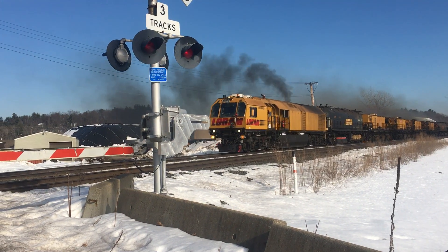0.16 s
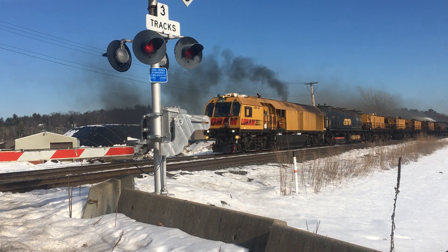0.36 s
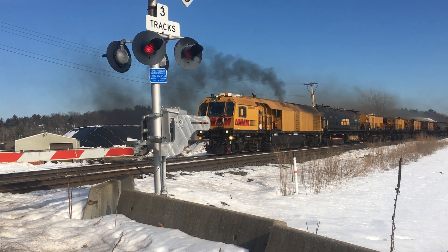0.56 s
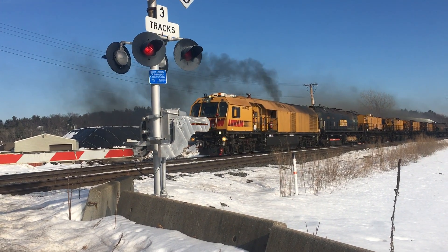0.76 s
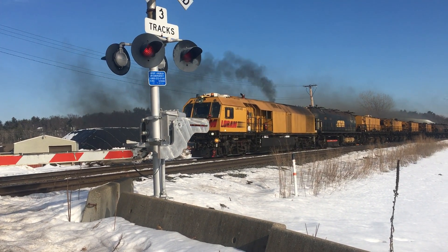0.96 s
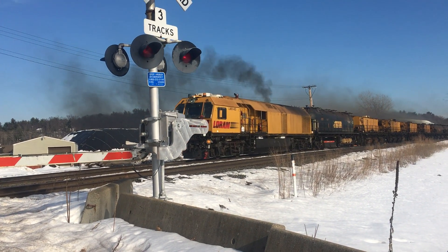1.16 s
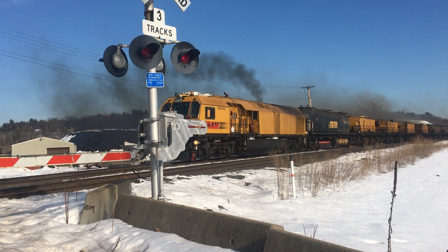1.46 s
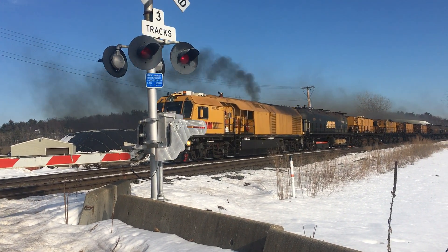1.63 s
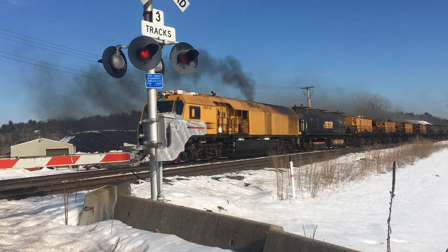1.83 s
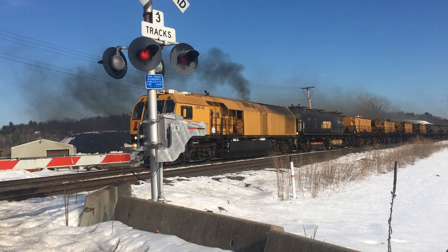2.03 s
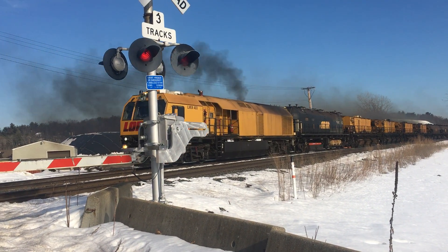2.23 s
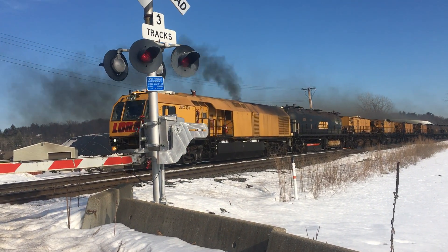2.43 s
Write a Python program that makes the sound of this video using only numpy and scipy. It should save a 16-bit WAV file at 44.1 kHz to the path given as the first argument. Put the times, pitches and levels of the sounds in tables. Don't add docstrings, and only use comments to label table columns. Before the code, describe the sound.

A loud three-note train horn blares, cuts off with a short echo, then a chugging diesel swells up.

```python
import sys
import numpy as np
from scipy import signal
from scipy.fft import rfft, irfft
from scipy.io import wavfile
from scipy.ndimage import uniform_filter1d, map_coordinates

SR = 44100
rng = np.random.default_rng(int(sys.argv[2]) if len(sys.argv) > 2 else 0)


def int16_out(signal):
    q = np.round(np.clip(np.atleast_2d(signal).T, -1, 1) * 32767)
    wavfile.write(sys.argv[1], SR, q.astype(np.int16))


def convert_level_to_amplitude(level_db):
    exponent = np.asarray(level_db, float) / 20
    return 10 ** exponent


N = 114219

CHIME_HZ = 311.02, 364.02, 486.9
LOW_CHIME = [-16, -5, 0, -2, -2, -6, -16, -26, -27, -19, -27, -23, -21, -21, -29, -40, -41, -45, -42, -39,
             -41, -45, -48, -57]
MID_CHIME = [-16, -6, -7, -11, -9, -25, -33, -29, -25, -38, -34, -31, -40, -47, -46, -41, -41, -48, -50,
             -53]
HIGH_CHIME = [-12, -2, 2, -7, -27, -27, -23, -28, -26, -38, -43, -40, -40, -43, -49]
# f/Hz, level/dB
FAINT_MULTIPLES = [(7300, -10), (8300, 3), (10000, 2), (12000, -3), (15700, -18.5)]
# t/s, low level/dB, middle level/dB, high level/dB, extra treble level/dB
BLAST = [
    (0, -9, -11, -6.5, 3.5),
    (.16, -7.5, -8.5, -6.5, -8),
    (.42, -7, -6.5, -7.5, 1.5),
    (.58, -5, -8.5, -7, 2),
    (.68, -9, -10, -8.5, 0),
    (.85, -11, -11, -6, -1.5),
    (1.001, -11.5, -6.5, -7, -3.5),
    (1.152, -10, -3, -6, -2.5),
    (1.27, -13, -7.5, -9.5, -1),
]
# f/Hz, level/dB
MIXING_TONES = [(250, -28), (900, -37), (1200, 0.5), (1650, 0), (2100, -17), (2330, -34.5), (2600, -18.5),
                (4600, -19)]
# f/Hz, level per Hz/dB
HORN_AIR = [(250, -11), (800, -13), (1500, -3.5), (2000, -8), (2330, -20), (2700, -22.5), (4400, -18.5),
            (5200, -32)]
# f/Hz, level per Hz/dB
HORN_HISS = [(5200, -9), (6500, 2.5), (7600, -17.5), (9500, -13.5), (12500, -21.5), (15700, -30.5)]
# t/s (delay), level/dB, lowest f/Hz, highest f/Hz
ECHOES = [
    (.03, -17, 200, 2500),
    (.06, -21, 2500, 9000),
    (.112, -16, 1800, 9000),
    (.105, -20, 880, 1020),
    (.25, -18, 590, 650),
    (.23, -25, 920, 990),
]
EXHAUST = [-30, -12, -4, 0, -14, -7, -22, -23, -12, -23, -18, -18, -23, -27, -27, -28, -31, -32, -32, -34,
           -33, -32, -32, -24]
# f/Hz, level per Hz/dB
ROAR = [(20, 9.5), (80, -7), (200, -16.5), (330, -23), (1000, -21), (1700, -21.5), (2150, -33.5),
        (2700, -50.5)]
# f/Hz, level per Hz/dB
HISS = [(2700, -9), (3100, -1.5), (4400, -1), (5200, -15.5), (6800, -16.5), (7700, -28), (9000, -25.5),
        (15700, -37)]


def horn(t):
    _, low_db, mid_db, high_db, treble_db = np.array(BLAST, float).T
    times = [row[0] for row in BLAST]
    low_db, mid_db, high_db, treble_db = (np.interp(t, times, x) for x in (low_db, mid_db, high_db, treble_db))
    shut = t - 1.3054
    after_shut = np.maximum(shut, 0)
    treble_db = treble_db + 1.5 * walk(140) - 707 * np.maximum(shut + .027, 0)

    low_tone, low_reed = chime(CHIME_HZ[0], LOW_CHIME, low_db, treble_db, after_shut)
    mid_tone, mid_reed = chime(CHIME_HZ[1], MID_CHIME, mid_db, treble_db, after_shut)
    high_tone, high_reed = chime(CHIME_HZ[2], HIGH_CHIME, high_db, treble_db, after_shut)
    mixed = (low_reed + mid_reed) * high_reed + .5 * low_reed * mid_reed

    sound = low_tone + mid_tone + high_tone + horn_air(mixed, treble_db) + horn_hiss(mixed, treble_db)
    direct = sound * convert_level_to_amplitude(-419.5 * after_shut)
    return snow_notch(direct + echoes(direct, t))


def chime(hz, multiples_db, pressure_db, treble_db, after_shut):
    live = int(1.5 * SR)
    pitch = hz * (1 + .000319 * walk(6) - .002 * np.minimum(after_shut * 20, 1))
    phase = 2 * np.pi * (np.cumsum(pitch) / SR + rng.random())
    shimmer = [walk(14.2)[:live] for _ in range(12)]
    tone = np.zeros(N)
    for k in range(1, int(15700 / hz) + 1):
        if k <= len(multiples_db):
            own_db = multiples_db[k - 1]
        else:
            own_db = -53 + read(FAINT_MULTIPLES, k * hz)
        treble_share = min(k * hz / 8000, 1)
        own_db = own_db + treble_share * treble_db[:live] + 2.28 * shimmer[k % 12]
        tone[:live] += convert_level_to_amplitude(pressure_db[:live] + own_db) * np.sin(k * phase[:live] + 6 * np.sqrt(k))
    reed = sum(np.cos(k * phase + k * k / 5) / k ** .65 for k in range(1, 16))
    return tone, reed


def horn_air(mixed, treble_db):
    mixing_tones = colour(mixed, MIXING_TONES) * convert_level_to_amplitude(-20 + 2 * walk(11))
    return mixing_tones + convert_level_to_amplitude(-20.5) * convert_level_to_amplitude(treble_db / 2) * noise(HORN_AIR, .95)


def horn_hiss(mixed, treble_db):
    pulses = 1 + .8 * np.tanh(level(mixed, 0))
    buzz = .67 * colour(mixed, HORN_HISS)
    return convert_level_to_amplitude(-46.5 + treble_db) * (noise(HORN_HISS, 1.2) * pulses + buzz)


def echoes(direct, t):
    out = np.zeros(N)
    for delay, db, low_hz, top_hz in ECHOES:
        drifting = t - delay + .0004 * walk(5)
        late = map_coordinates(direct, [drifting * SR], order=1, mode="mirror")
        band = signal.butter(2, [low_hz, top_hz], "band", fs=SR, output="sos")
        out = out + convert_level_to_amplitude(db) * signal.sosfilt(band, late)
    return out


def snow_notch(x):
    notch_hz, width_hz = 2325, 170
    return signal.lfilter(*signal.iirnotch(notch_hz, notch_hz / width_hz, fs=SR), x)


def engine(t):
    since = t - 2.22
    turns = 15.19 * since + .018 * since ** 2 / 2
    roar = noise(ROAR, .5)
    low = signal.sosfilt(signal.butter(2, 200, fs=SR, output="sos"), roar)
    high = signal.sosfilt(signal.butter(2, 200, "high", fs=SR, output="sos"), roar)
    rumble = level(low, -32.5)
    rush = level(high, -26) + convert_level_to_amplitude(-48) * noise(HISS, 1.2)
    rush = rush * convert_level_to_amplitude(puffs(turns) + 2.5 * (t - 2))
    return (level(exhaust(turns), -21) + rumble + rush) * convert_level_to_amplitude(1.5 * (t - 3))


def exhaust(turns):
    thump = np.zeros(N)
    for k, db in enumerate(EXHAUST, start=1):
        strength = convert_level_to_amplitude(db + 2.12 * np.sqrt(k) / 2 * walk(7))
        stack_phase = 24 / k ** 2 - .5
        drift = .12 * max(k - 6, 0) * walk(9)
        thump += strength * np.cos(2 * np.pi * k * turns + stack_phase + drift)
    return thump


def puffs(turns):
    late = turns - .06
    scatter = rng.standard_normal(99)[np.round(late).astype(int)]
    from_peak = (late + .5) % 1 - .5
    return np.exp(-.5 * (from_peak / .065) ** 2) * (4 + .8 * scatter)


def noise(table, flicker_db):
    spec, hz = shaped(rng.standard_normal(N), table)
    octave = np.log2(np.maximum(hz, 1) / 20)
    first = int(2 * np.log2(table[0][0] / 20)) / 2
    last = np.log2(table[-1][0] / 20)
    out = np.zeros(N)
    for centre in np.arange(first, last + .5, .5):
        band = irfft(spec * np.clip(1 - 2 * abs(octave - centre), 0, 1), N)
        out = out + band * convert_level_to_amplitude(flicker_db * walk(24))
    return level(out, 0)


def colour(x, table):
    return level(irfft(shaped(x, table)[0], N), 0)


def shaped(x, table):
    hz = np.arange(N // 2 + 1) * SR / N
    inside = (hz >= table[0][0]) * (hz < table[-1][0])
    return rfft(x) * convert_level_to_amplitude(read(table, hz)) * inside, hz


def read(table, hz):
    table = np.array(table, float)
    return np.interp(np.log(np.maximum(hz, 1)), np.log(table[:, 0]), table[:, 1])


def walk(rate):
    k = int(SR / rate)
    steps = np.repeat(rng.standard_normal(400), k)
    return 1.3 * uniform_filter1d(uniform_filter1d(steps, k), k)[:N]


def level(x, db):
    return x * convert_level_to_amplitude(db) / np.sqrt(np.mean(x ** 2))


def scene():
    t = np.arange(N) / SR
    return (horn(t) + engine(t))[None]


def phone_gain(x):
    loud_db = 10 * np.log10(uniform_filter1d(x ** 2, int(.017 * SR)) + 1e-12)
    want_db = -.97 * np.maximum(loud_db + 17.5, 0)
    climb = 28 * np.arange(N) / SR
    gain_db = np.minimum.accumulate(want_db - climb) + climb
    return uniform_filter1d(gain_db, int(.13 * SR))


def band_limit(x):
    return signal.sosfilt(signal.butter(12, 15750, fs=SR, output="sos"), x)


def record(dry):
    mix = dry * convert_level_to_amplitude(phone_gain(dry[0]))
    return band_limit(mix)


dry = scene()
out = record(dry)
int16_out(out)
```